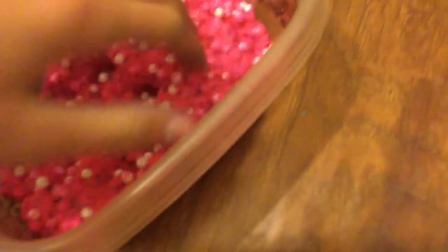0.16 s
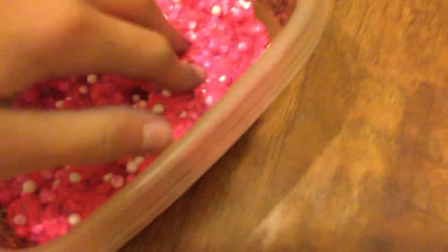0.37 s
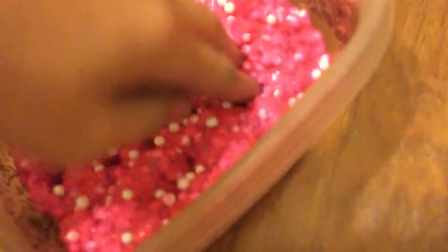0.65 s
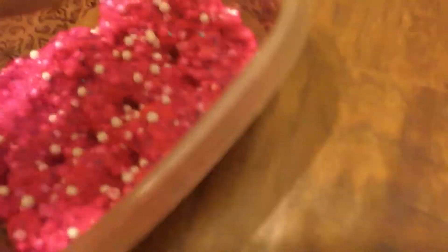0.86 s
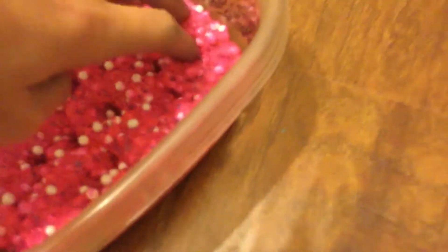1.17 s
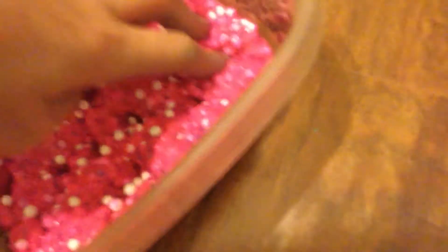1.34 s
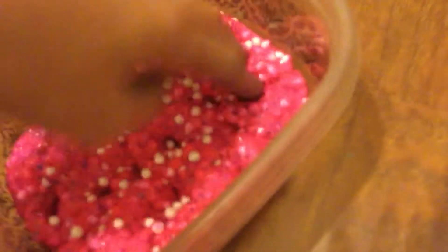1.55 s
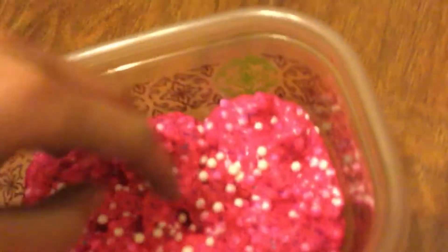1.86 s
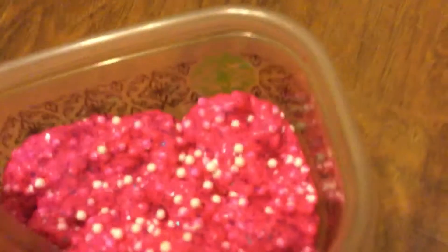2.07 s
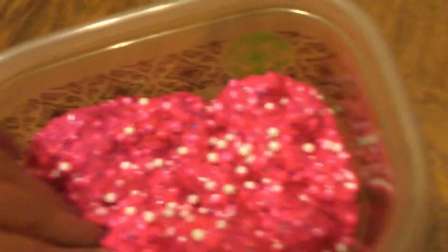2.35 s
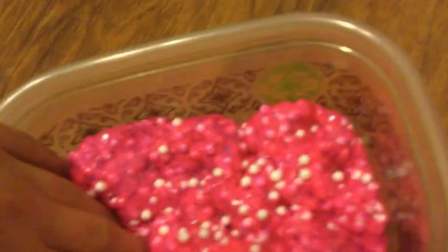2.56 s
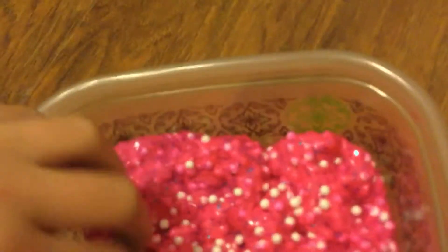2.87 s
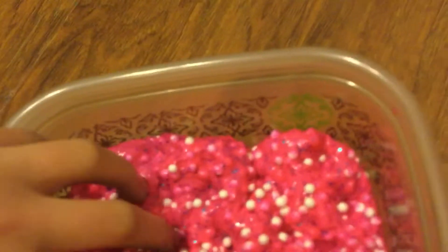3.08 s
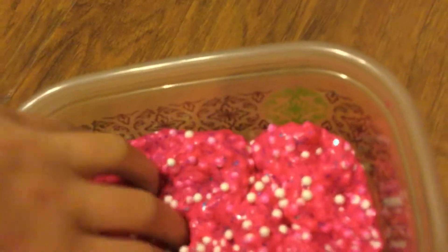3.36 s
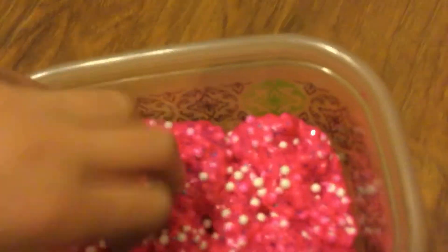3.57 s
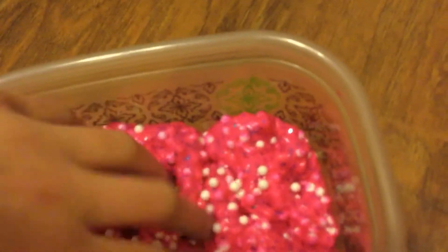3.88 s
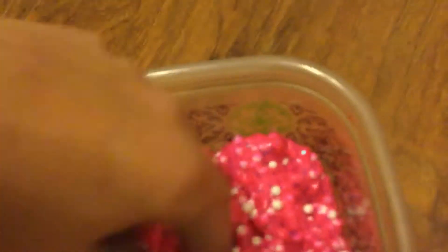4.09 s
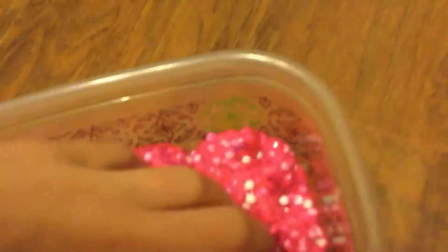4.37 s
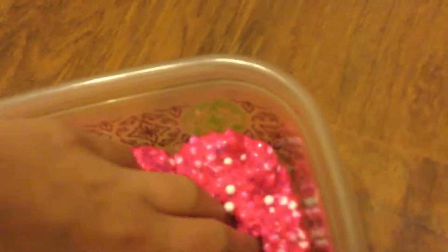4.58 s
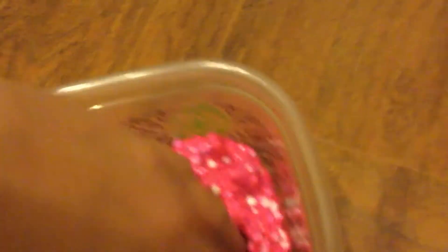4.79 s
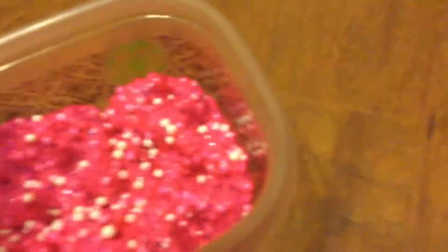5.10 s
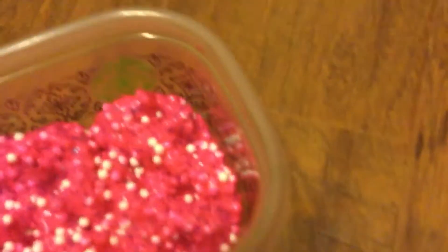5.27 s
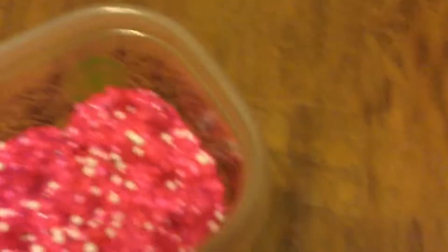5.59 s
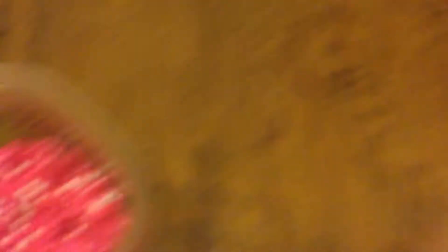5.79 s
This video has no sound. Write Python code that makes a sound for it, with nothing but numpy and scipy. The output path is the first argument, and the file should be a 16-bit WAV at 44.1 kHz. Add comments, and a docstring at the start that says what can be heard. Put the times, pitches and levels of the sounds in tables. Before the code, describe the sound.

A phone close to a plastic tub picks up fingers kneading slime packed with tiny beads, in a small quiet room. From 0.2 to 0.6 seconds there is fizzy bright crackle with several sharp, high snaps. A loud hollow pop with a low tub knock hits at 0.9, followed by crisp ticks around 1.2 to 1.5. The loudest pop and thump lands at 1.8 with a quick wet cluster after it. Soft crackles and small clicks fill 2.1 to 2.6, then a duller, wet burst group comes at 2.9. More rounded pops follow at 3.6 to 3.8. From 4.1 to 4.8 only light, thin crackles and ticks are heard, then near silence until wet squelchy crackling and pops at 5.5 to 5.8. Beneath is a faint low murmur, swelling slightly after 5.15, and a barely audible whirr that stops around 5.0. Gaps are almost silent; the room tail is faint and short.

```python
"""Wet pops, thumps and fine crackle close by, over a faint murmur, near silence between squeezes.
Fingers knead bead slime in a plastic tub on a wooden table, close to a phone in a small room.
Air pockets between the beads burst as short resonant noise: large ones pop and thump the tub,
small ones crackle with the kneading. Tub and room are resonances and a decaying noise tail.
The phone's noise suppressor turns down weak bands and lulls."""
import sys
import numpy as np
from scipy import signal
from scipy.fft import rfft, irfft
from scipy.io import wavfile
from scipy.ndimage import uniform_filter1d

SR = 44100
rng = np.random.default_rng(int(sys.argv[2]) if len(sys.argv) > 2 else 0)


def output_pcm(signal):
    """Save a mono or channel-first signal as 16-bit PCM at the path in sys.argv[1].

    Samples are clipped to [-1, 1] before scaling.
    """
    pcm = np.clip(np.atleast_2d(signal).T, -1, 1) * 32767
    wavfile.write(sys.argv[1], SR, np.round(pcm).astype(np.int16))


N = 261865


def undb(db):
    """Amplitude ratio from dB."""
    return 10 ** (np.asarray(db) / 20)


def band(x, hz, width_hz):
    """Resonance with gain 1 at the centre."""
    b, a = signal.iirpeak(hz, hz / width_hz, SR)
    return signal.lfilter(b, a, x)


def place(rows, start_s):
    """Mix short sounds into the time line at their start times."""
    size = rows.shape[1]
    at = (np.asarray(start_s) * SR).astype(int)[:, None] + np.arange(size)
    return np.bincount(at.ravel(), rows.ravel(), N + size)[:N]


def bursts(level_db, colour_hz, q, skirt_db, cycles, size):
    """A film tears in a dying noise burst; the pocket rings at its colour over a broad skirt."""
    hz = colour_hz[:, None]
    n = np.arange(size)
    decay = np.exp(-n / SR * hz / cycles)  # to 1/e in the given cycles
    tear = rng.standard_normal((len(level_db), size)) * decay

    ratio = np.arange(1, size + 2) * SR / (2 * size) / hz
    pocket = 1 / (1 + 1j * q * (ratio - 1 / ratio))
    treble_cut = 1 / (1 + 1j * ratio / 2)  # an octave above the colour
    bass_cut = 1 / (1 - 1000j / (ratio * hz)) ** 2  # two poles at 1000 Hz
    skirt = undb(skirt_db) * treble_cut * bass_cut

    rows = irfft(rfft(tear, 2 * size) * (pocket ** 2 + skirt))[:, :size]
    rows = rows * np.cos(n / size * np.pi / 2)
    peak_rms = np.sqrt(uniform_filter1d(rows ** 2, size=30).max(axis=1))
    return rows * (undb(level_db) / peak_rms)[:, None]


def pops():
    """Large pockets burst, heard nearby and by the room, and knock on the tub floor."""
    # large pockets: t/s, burst level/dB, colour f/Hz, knock on tub floor/dB
    large_pockets = [(0.0192, -26.5, 6800, -32), (0.154, -41, 5470, -70), (0.2433, -18, 2230, -26),
                     (0.268, -28.5, 8200, -61), (0.294, -30.5, 12650, -56), (0.32, -16, 7500, -57),
                     (0.429, -35.5, 3530, -72), (0.452, -29.5, 7800, -57), (0.462, -27, 8100, -67),
                     (0.475, -16.5, 10400, -79), (0.5129, -4.5, 10500, -81), (0.555, -33, 2970, -59),
                     (0.5715, -8, 11200, -68), (0.6099, -7.5, 7050, -60.5), (0.803, -17.5, 8900, -46.5),
                     (0.861, -27, 2780, -39), (0.869, -22, 4000, -37.5), (0.887, -23.5, 6640, -48),
                     (0.9074, -23, 2510, -44), (0.9123, 2.5, 3340, -12.5), (0.9188, -18, 1390, -23.5),
                     (0.9364, -11.5, 2380, -29), (1.136, -33, 3350, -50), (1.196, -13, 4450, -68),
                     (1.233, -18, 7100, -54), (1.257, -28.5, 9300, -75), (1.342, -22.5, 12000, -50),
                     (1.376, -28, 2310, -55), (1.417, -5, 5430, -51), (1.434, -16, 12200, -55),
                     (1.444, -14, 11700, -51), (1.4759, -19.5, 7800, -47.5), (1.7315, -28.5, 404, -20),
                     (1.8256, 8.5, 3550, -5.5), (1.856, -21, 2200, -29), (1.8715, -9, 3040, -26),
                     (1.8798, -5.5, 2800, -35), (1.8897, -14.5, 2490, -22.5), (1.909, -19, 2330, -31),
                     (2.1218, -35.5, 820, -29.5), (2.1613, -24, 2340, -41), (2.1663, -33, 1235, -33.5),
                     (2.3242, -30.5, 6140, -53), (2.4099, -38, 1400, -39.5), (2.4552, -26.5, 7900, -44),
                     (2.4617, -24, 2130, -40.5), (2.4741, -20.5, 7100, -47), (2.502, -21.5, 7340, -52),
                     (2.5299, -17, 6750, -66), (2.781, -26, 6300, -48), (2.8591, -20, 1420, -38),
                     (2.8687, -21.5, 2610, -42), (2.8873, -25, 3610, -51), (2.9043, -23.5, 1660, -27),
                     (2.9254, -5.5, 2710, -14.5), (2.9329, -15.5, 2130, -20), (2.9696, -8, 2550, -17.5),
                     (2.975, -16.5, 1900, -28), (2.987, -17.5, 2700, -30.5), (2.993, -21.5, 1220, -23),
                     (3.133, -43.5, 2520, -56.5), (3.2222, -26.5, 11500, -58), (3.582, -4, 2110, -26.5),
                     (3.6406, -5.5, 1570, -17.5), (3.6579, -16, 1280, -30), (3.7142, -14.5, 2800, -24),
                     (3.733, -26, 1720, -30), (3.7746, -19, 1740, -33.5), (3.918, -40, 1500, -63),
                     (3.949, -30, 3650, -55), (4.178, -23, 4970, -44), (4.229, -27, 4660, -36.5),
                     (4.241, -21.5, 6240, -37), (4.437, -28.5, 11000, -67), (4.5694, -19, 9840, -87),
                     (4.6415, -16.5, 8300, -75), (4.6462, -21.5, 6600, -69), (4.665, -28, 8100, -66),
                     (4.735, -24, 6360, -56), (5.0716, -32, 3990, -76.5), (5.4761, -27.5, 1310, -43.5),
                     (5.4867, -24, 2190, -50.5), (5.508, -11, 2080, -60), (5.5177, -16.5, 1880, -54),
                     (5.532, -14.5, 1880, -47), (5.6349, -22.5, 3070, -66), (5.7243, -23.5, 2000, -45),
                     (5.7641, -16.5, 1720, -18), (5.7716, -6, 2730, -20.5), (5.87, -21, 3120, -49),
                     (5.915, -64, 900, -35)]
    start_s, level_db, colour_hz, thump_db = np.transpose(large_pockets)
    shape = dict(q=.7, skirt_db=-9, size=512)
    snap = place(bursts(level_db, colour_hz, cycles=3, **shape), start_s)
    # the room gathers all directions: no ripple of a single one
    even = place(bursts(level_db, colour_hz, cycles=.5, **shape), start_s)
    knocks = place(undb(thump_db)[:, None], start_s)
    return snap, even, knocks


def kneading(s):
    """Crackle level and brightness in dB at times s; where gestures overlap, the louder one leads."""
    # squeezes: start t/s, length t/s, level/dB, swell over the squeeze/dB, mid-squeeze brightness/dB
    squeezes = [(0.0, 0.05, -43, 3.5, 5.5), (0.227, 0.41, -55.5, 6, 13), (0.733, 0.062, -51, 3, 25),
                (0.808, 0.058, -41, -2, 5), (1.168, 0.12, -58.5, 6, 4.5), (1.225, 0.29, -46.5, -11, 9),
                (1.592, 0.069, -59, 16, 7), (1.679, 0.13, -40, -20, 1.5), (2.288, 0.041, -51.5, 0.5, 14),
                (2.349, 0.23, -54, 4.5, 4.5), (2.717, 0.16, -54, 6.5, 0.5), (3.143, 0.17, -57.5, 4, 4),
                (3.472, 0.15, -52.5, 11.5, 0), (3.788, 0.047, -60.5, 9.5, -7),
                (3.883, 0.12, -61.5, 14.5, 2.5), (4.145, 0.079, -44.5, 4, 7.5),
                (4.432, 0.17, -56, 11, 11.5), (4.607, 0.079, -53.5, -7.5, 0.5),
                (4.703, 0.0091, -72.5, 14, -3.5), (4.803, 0.14, -52.5, 10, 2),
                (5.478, 0.047, -48.5, 18, -0.5), (5.574, 0.32, -45, -20.5, -2.5),
                (5.794, 0.12, -44.5, -3.5, 5)]
    # slime settling after large bursts: t/s, peak level/dB
    slumps = [(0.918, -48.5), (1.84, -38), (2.157, -53), (2.931, -37), (2.987, -51), (3.653, -44.5),
              (3.722, -51), (5.518, -36.5), (5.771, -35)]
    press_db_per_s, lift_db_per_s = 563.5, 498
    dulling_db_per_s = 40  # the surface fizzes first, wetter pockets follow
    slump_rise_db_per_s, slump_fade_db_per_s, slump_bright_db = 899.5, 227.5, -9.5

    start, length, level_db, swell_db, bright_db = np.transpose(squeezes)[..., None]
    held = np.clip(s - start, 0, length)
    press_db = press_db_per_s * np.maximum(start - s, 0)
    lift_db = lift_db_per_s * np.maximum(s - start - length, 0)
    squeeze_db = level_db + swell_db * held / length - press_db - lift_db
    squeeze_bright_db = bright_db - dulling_db_per_s * (held - length / 2)

    at, peak_db = np.transpose(slumps)[..., None]
    slump_db = peak_db - np.maximum(slump_rise_db_per_s * (at - s), slump_fade_db_per_s * (s - at))

    power = undb(2 * np.vstack([squeeze_db, slump_db])) + 1e-30
    brightness = np.vstack([squeeze_bright_db, np.full_like(slump_db, slump_bright_db)])
    total = power.sum(axis=0)
    return 10 * np.log10(total), (power * brightness).sum(axis=0) / total


def crackle(count=11000):
    """Countless small pockets of very uneven size; harder kneading is louder and presses on the floor."""
    s = np.sort(rng.random(count)) * (N - 1) / SR
    size_chance, colour_chance, sign_chance = rng.random((3, count))
    level_db, bright_db = kneading(s)

    # pockets burst in clumps (512 samples) that share strength and colour
    patch_sd_db, patch_sd_octaves = 1.5, .2
    clump = rng.standard_normal((2, N // 512 + 1))[:, (s * SR).astype(int) // 512]
    size_db = np.minimum(-2.7 * np.log(size_chance), 14)
    db = level_db + patch_sd_db * clump[0] + size_db
    octaves = bright_db / 8 + patch_sd_octaves * clump[1] + 2.2 * (colour_chance - .5)
    hz = np.clip(3200 * 2 ** octaves, 700, 14000)
    fizz = place(bursts(db, hz, q=1.2, skirt_db=-9, cycles=1.6, size=256), s)

    # dull, wet kneading pushes the floor more than bright surface fizz
    push = undb(db - 17.5 - .6 * bright_db) * np.sign(sign_chance - .5)
    return fizz, place(push[:, None], s)


def tub(air, knocks):
    """Walls colour the bursts; the floor rings low, setting in over about a ms as the slime gives way."""
    # walls and hollow: f/Hz, width/Hz, gain/dB
    wall_modes = [(957, 600, -1.5), (3410, 420, -13), (5600, 1400, -9)]
    # floor on the table: f/Hz, gain/dB, t60/s
    floor_modes = [(218, -9.5, 0.038), (257, -6, 0.018), (346, 13.5, 0.006)]
    walls = air / 2
    for hz, width_hz, db in wall_modes:
        walls = walls + undb(db) * band(air, hz, width_hz)

    t = np.arange(SR // 8) / SR
    ring = np.zeros(len(t))
    for hz, db, t60_s in floor_modes:
        ring += undb(db) * np.sin(2 * np.pi * hz * t) * 1000. ** (-t / t60_s)
    ring *= 1 - np.exp(-t / 0.0011)
    return walls + signal.fftconvolve(knocks, ring)[:N]


def room(x):
    """Diffuse tail of decaying noise bands after the first 3 ms, shortest in the top treble."""
    # tail bands: f/Hz, t60/s, gain/dB
    tail_bands = [(420, 0.27, -37), (3200, 0.33, -46.5), (9800, 0.15, -41)]
    t = np.arange(SR // 2) / SR
    tail = np.zeros(len(t))
    for hz, t60_s, db in tail_bands:
        noise = band(rng.standard_normal(len(t)), hz, 2 * hz)
        tail += undb(db) * noise * 1000. ** (-t / t60_s)
    return signal.fftconvolve(x, tail * (t > .003))[:N]


def hum(size=1024):
    """Low noise-band murmur of the house that comes and goes, and a faint whirr that stops."""
    drag_start_s, drag_db = 5.15, 6  # the tub slides on the table and the murmur swells
    whirr_stop_s, whirr_hz, whirr_width_hz, whirr_gain_db = 5.04, 1150, 260, -54
    t = np.arange(N) / SR

    steps = np.repeat(rng.standard_normal(N // size + 1), size)
    waver = uniform_filter1d(steps, size)[:N]
    murmur_db = -40 + 3 * waver + drag_db * (t > drag_start_s)
    murmur = band(band(rng.standard_normal(N), 200, 70), 280, 100) * undb(murmur_db)

    whirr = band(rng.standard_normal(N), whirr_hz, whirr_width_hz)
    whirr = band(whirr, whirr_hz, 2 * whirr_width_hz) * undb(whirr_gain_db)
    return murmur + whirr * (t < whirr_stop_s)


def scene():
    """Pops and crackle through the tub, direct and by the room, over the hum."""
    snap, even, knocks = pops()
    fizz, pushes = crackle()
    floor_force = knocks + pushes
    near = tub(snap + fizz, floor_force)
    far = room(tub(even + fizz, floor_force))
    return (near + far + hum())[None]


def suppress(x, quiet_db, size=512):
    """Noise suppressor: turns down bands that sink towards the assumed noise, and all in a lull."""
    # noise it assumes: f/Hz, level per STFT bin/dB
    assumed_noise = [(230, -86), (1800, -92), (2400, -72), (3000, -83), (3600, -82), (4100, -74),
                     (4900, -88), (6000, -88)]
    frames = dict(fs=SR, nperseg=size, noverlap=size - size // 4)
    hz, _, z = signal.stft(x, **frames)
    power = uniform_filter1d(np.abs(z) ** 2, size=7, axis=-2)
    # 6 frames back to 2 ahead: open on a hit, late to close
    power = uniform_filter1d(power, size=9, axis=-1, origin=2)
    noise = undb(2 * np.interp(hz, *np.transpose(assumed_noise)))[:, None]
    total = power.sum(axis=-2, keepdims=True)
    band_gain = (power / (power + noise)) ** 2
    lull_gain = (total / (total + undb(2 * quiet_db))) ** 2
    return signal.istft(z * band_gain * lull_gain, **frames)[1][..., :N]


def record(dry):
    """Bass cut, allpass lag that lets the lows arrive late, suppressor, soft peaks, top cut."""
    bass_cut_hz, lag_hz, top_hz = 130, 700, 15700
    x = signal.sosfilt(signal.butter(4, bass_cut_hz, "high", fs=SR, output="sos"), dry)
    lag = np.exp(-2 * np.pi * lag_hz / SR)
    for _ in range(6):
        x = signal.lfilter([-lag, 1], [1, -lag], x)
    x = suppress(x, quiet_db=-67)
    x = .8 * np.tanh(x)
    return signal.sosfilt(signal.ellip(10, .2, 90, top_hz, fs=SR, output="sos"), x)


dry = scene()
out = record(dry)
output_pcm(out)
```